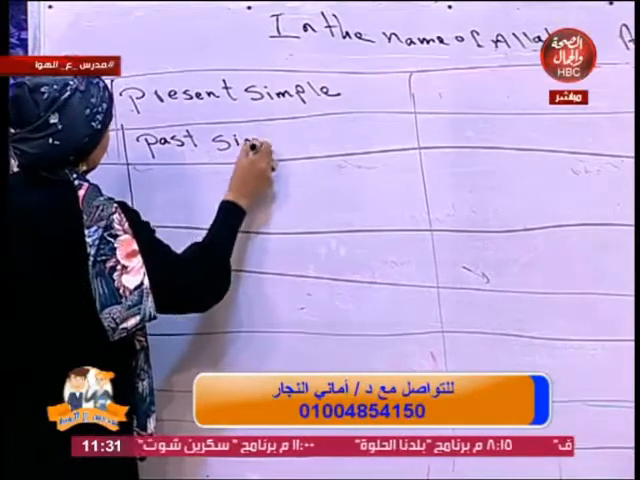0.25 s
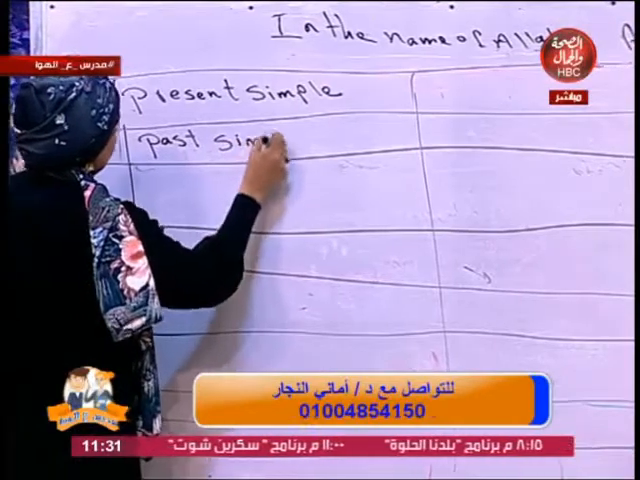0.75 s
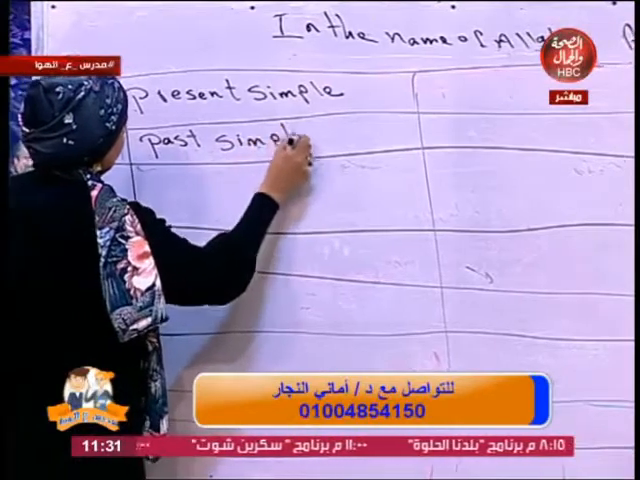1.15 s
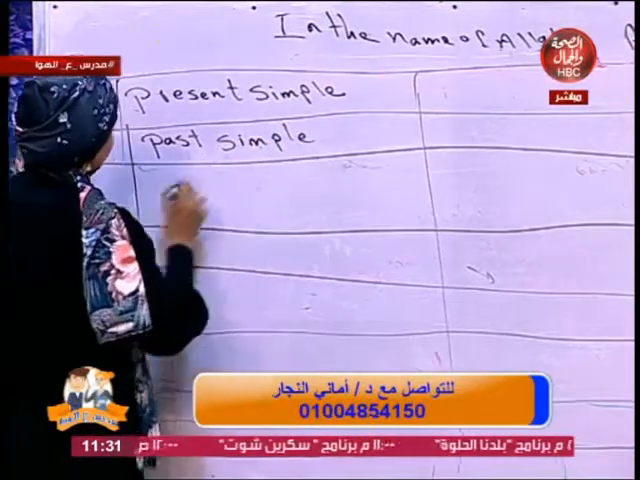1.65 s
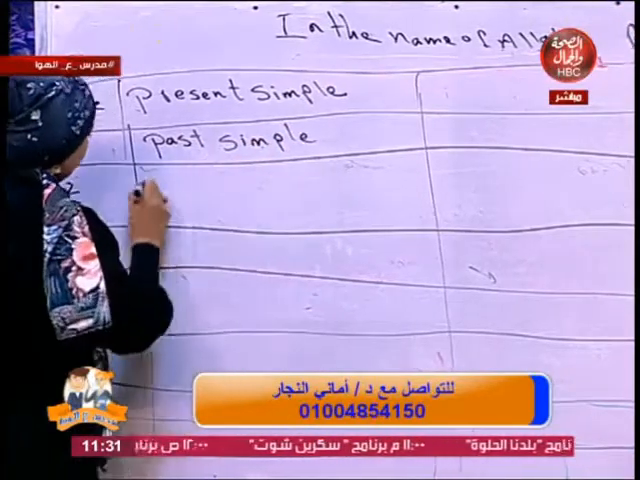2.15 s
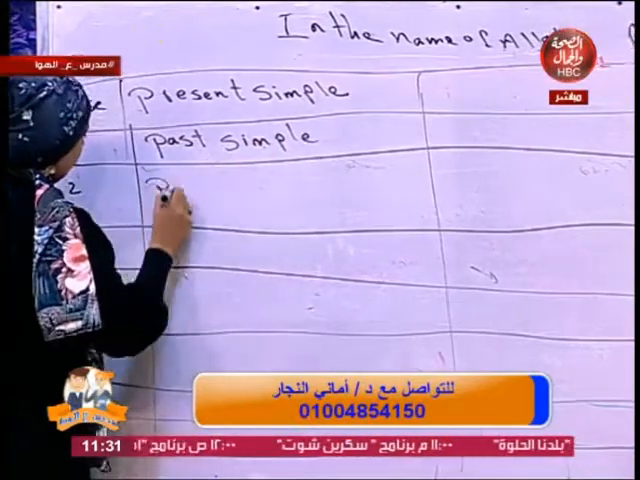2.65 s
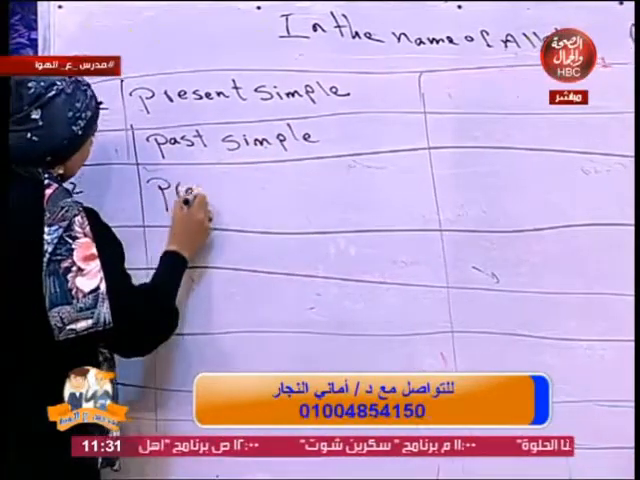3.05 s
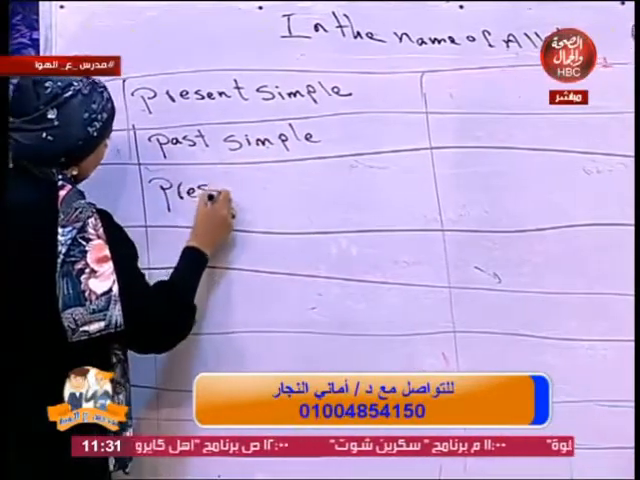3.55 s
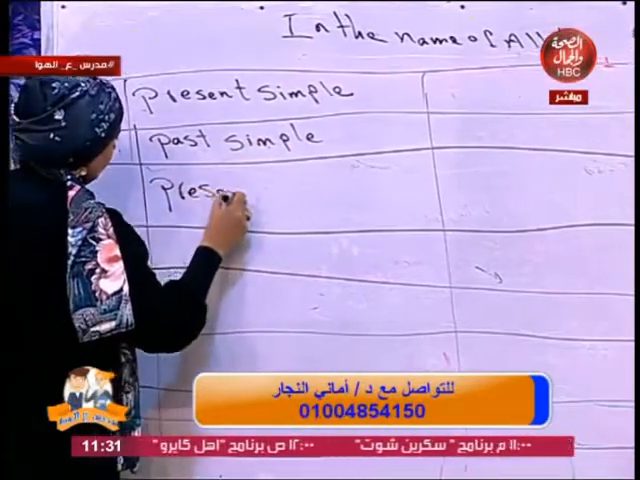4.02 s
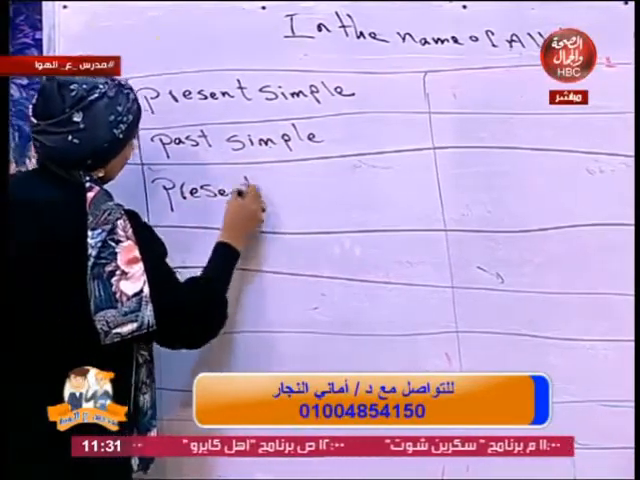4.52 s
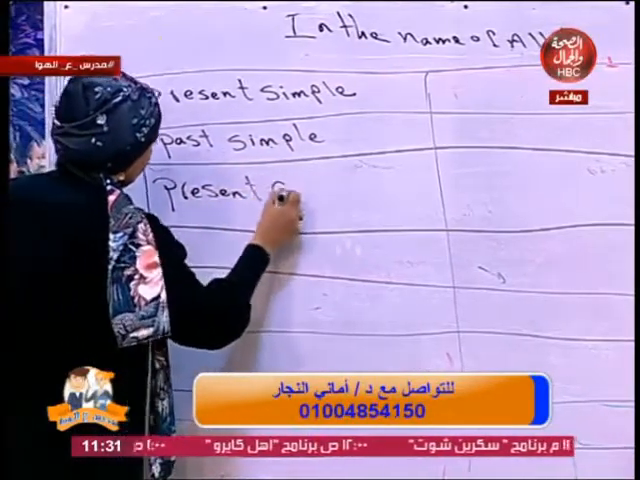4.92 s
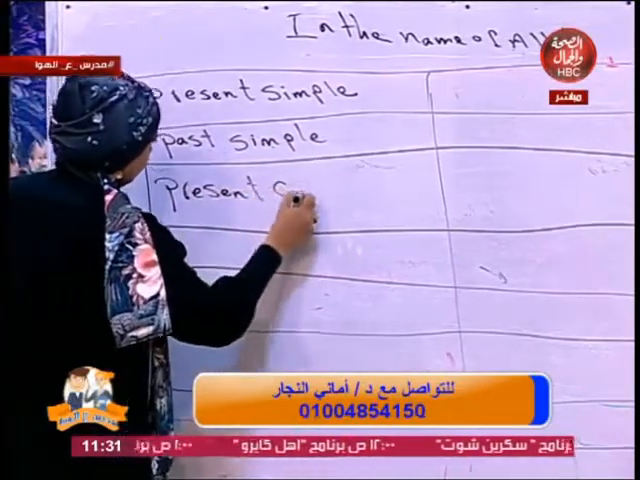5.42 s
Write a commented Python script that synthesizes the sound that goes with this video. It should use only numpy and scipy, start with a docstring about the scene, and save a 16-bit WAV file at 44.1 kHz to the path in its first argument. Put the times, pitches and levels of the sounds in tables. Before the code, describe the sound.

A felt marker hisses in short grainy strokes on a large whiteboard, its landings knocking the hollow panel, in a quietly humming room.

```python
"""A felt marker writes on a large wall whiteboard in a quiet room that hums faintly throughout.
From the start the felt hisses, thin and grainy, stroke by stroke, and the hand slides softly on the panel.
Soon each landing of the tip knocks the panel, which booms briefly; some strokes judder into a faint squeak.
A sleeve brushes at times, also under the writing: crinkling noise in smooth swells, coloured as cloth.
Near the end something hollow knocks close by and rebounds: short modes with a dense clatter.
"""
import sys
import numpy as np
from scipy import signal
from scipy.fft import rfft, irfft
from scipy.io import wavfile
from scipy.ndimage import map_coordinates

SR = 44100
rng = np.random.default_rng(int(sys.argv[2]) if len(sys.argv) > 2 else 0)


def file_out(sig):
    """Save sig as 16-bit WAV at sys.argv[1]."""
    # one column per channel
    cols = np.atleast_2d(sig).T
    # limit, then scale
    lim = np.clip(cols, -1, 1)
    pcm = np.round(lim * 32767).astype(np.int16)
    wavfile.write(sys.argv[1], SR, pcm)


N = 250488
TIME = np.arange(N) / SR
CUTOFF_HZ = 10350  # top of the finished sound


def from_db(db):
    """Decibels to gain."""
    return 10 ** (np.asarray(db) / 20)


def rms_one(x):
    """Scale to unit power."""
    return x / np.sqrt(np.mean(x ** 2) + 1e-20)


def coloured(x, spectrum):
    """Give a steady sound a spectrum of (f/Hz, relative level/dB) points, joined on a log axis; rms 1."""
    hz, db = np.transpose(spectrum)
    bins = np.maximum(np.fft.rfftfreq(len(x), 1 / SR), 1)
    gain = from_db(np.interp(np.log(bins), np.log(hz), db))
    return rms_one(irfft(rfft(x) * gain, len(x)))


def drift(rate, size=N):
    """Smooth chance with spread 1, through `rate` random points per second."""
    knots = rng.standard_normal(4000)
    places = np.arange(size) / SR * rate
    return rms_one(map_coordinates(knots, [places], order=2, mode="wrap"))


def narrow_noise(centre_hz, width_hz):
    """Noise in one resonance: slow complex noise shifted up to the centre; rms 1."""
    sos = signal.butter(2, width_hz / 2, fs=SR, output="sos")
    slow = signal.sosfilt(sos, rng.standard_normal(N) + 1j * rng.standard_normal(N))
    return rms_one(np.real(slow * np.exp(2j * np.pi * centre_hz * TIME)))


def fade(start, end, rise_s, fall_s):
    """A gate with soft edges, half open at start and end."""
    opening = np.clip((TIME - start) / rise_s + .5, 0, 1)
    closing = np.clip((end - TIME) / fall_s + .5, 0, 1)
    return opening * closing


def die_away(s, decay_s):
    """A sudden onset that falls exponentially, to 1/e in decay_s."""
    return (TIME > s) * np.exp(-np.clip(TIME - s, 0, 1) / decay_s)


def swells(rows):
    """Movements that grow and die away as bells, down to 1/e at the half-length."""
    total = 0
    for s, half_s, db in rows:
        bell = np.exp(-np.minimum(((TIME - s) / half_s) ** 2, 50))
        total = total + from_db(db) * bell
    return total


def push(s, hz):
    """Pressure from a short smooth push: the second derivative of a bell, its spectrum peaking at hz."""
    u = np.minimum((np.pi * hz * (TIME - s)) ** 2, 50)
    return (2 * u - 1) * np.exp(-u)


def resonate(x, hz, width_hz):
    """One resonance with gain 1 on top."""
    return signal.lfilter(*signal.iirpeak(hz, hz / width_hz, fs=SR), x + 1e-18)


def ring(force, modes, delay_s, build_s):
    """Damped modes that start after a delay and build up as the waves come back from the edges."""
    t = np.maximum(TIME[:SR] - delay_s, 0)
    response = 0
    for k, (hz, db, t60) in enumerate(modes):
        mode = from_db(db - 60 * t / t60) * np.sin(2 * np.pi * hz * t)
        response = response + mode * (-1) ** k  # neighbours ring in opposite sense
    return signal.fftconvolve(force, response * (1 - np.exp(-t / build_s)))[:N]


# murmur of the room: f/Hz, relative level/dB
AIR_SPECTRUM = [(15, -50), (25, -28), (48, -11), (126, 1.5), (345, -5), (433, -4), (586, -7.5), (682, -9.5),
                (946, -10.5), (1070, -12.5), (1190, -14), (1870, -18), (2180, -18.5), (3890, -23),
                (10400, -29.5), (13500, -73), (22000, -120)]
AIR_DB = -62.7


def air():
    """The steady murmur of the room: coloured noise."""
    return from_db(AIR_DB) * coloured(rng.standard_normal(N), AIR_SPECTRUM)


# diffuse tail of the room, by octave: centre f/Hz, relative level/dB, t60/s
ROOM_TAIL = [(68.7, -7.5, 0.72), (158, -16, 0.9), (301, -9.5, 0.42), (688, -8.5, 0.27), (1270, -21, 0.75),
             (2580, -17.5, 0.35)]


def room(x, delay_s=0.0046, level_db=-23.0):
    """A diffuse tail: octaves of noise that each die at their own rate."""
    t, tail = np.maximum(TIME[:SR] - delay_s, 0), 0
    for hz, db, t60 in ROOM_TAIL:
        sos = signal.butter(2, [hz / np.sqrt(2), hz * np.sqrt(2)], "band", fs=SR, output="sos")
        dying = rng.standard_normal(SR) * (t > 0) * from_db(db - 60 * t / t60)
        tail = tail + signal.sosfilt(sos, dying)
    return signal.fftconvolve(x, tail * from_db(level_db))[:N]


# first reflections from floor, ceiling and walls: delay t/s, level/dB
FIRST_ECHOES = [(0.0107, -12.5), (.0131, -7.5), (0.0169, -14.5), (.0217, -7.5), (0.0295, -22.5)]


def reflections(x):
    """The nearest surfaces send the knock back a few times."""
    return sum(from_db(db) * np.interp(TIME - delay, TIME, x, left=0) for delay, db in FIRST_ECHOES)


# brushes of the sleeve: middle t/s, half-length t/s, level/dB
SLEEVE_BRUSHES = [(1.64, 0.055, -61), (2.15, 0.35, -67), (4.02, 0.32, -64.5), (5.25, 0.031, -66),
                  (5.43, 0.13, -64.5)]
# colour of the cloth: f/Hz, relative level/dB
CLOTH_SPECTRUM = [(80, 9), (300, 8.5), (1000, 4.5), (2300, -1.5), (4000, -6.5), (7000, -10.5), (10500, -13)]


def sleeve():
    """Cloth brushes as the arm moves on: crinkling noise under smooth swells."""
    crinkle = from_db(1.5 * drift(120))
    return swells(SLEEVE_BRUSHES) * coloured(rng.standard_normal(N) * crinkle, CLOTH_SPECTRUM)


# slides of the hand on the panel: middle t/s, half-length t/s, level/dB
HAND_SLIDES = [(.16, 0.048, -66), (.34, 0.18, -67), (.58, 0.074, -68.5)]


def hand_slide():
    """The side of the hand rubs softly along the panel, a resonant band of noise."""
    return swells(HAND_SLIDES) * narrow_noise(centre_hz=843, width_hz=310)


# a hollow knock close by and its rebound: t/s, relative level/dB
HOLLOW_KNOCKS = [(5.1325, -38), (5.228, -54.5)]
# modes of the hollow thing: f/Hz, relative level/dB, t60/s
HOLLOW_MODES = [(341, 3, 0.12), (368, -1, 0.095), (503, -8, 0.057), (584, -5.5, 0.065), (740, -8, 0.064),
                (917, -4, 0.087), (980, -10, 0.027), (1090, -12, 0.055), (1390, -2, 0.022),
                (1720, -13, 0.034), (2030, -16, 0.039)]


def hollow_knock(body_db=-0.5, clatter_db=-13.0, clatter_t60_s=0.077, tail_db=-8.5, tail_t60_s=0.47):
    """A hard knock: a few short modes, a dense clatter and its own tail in the room."""
    clicks, envelope = np.zeros(N), 0
    for s, db in HOLLOW_KNOCKS:
        clicks[round(s * SR)] = from_db(db)
        t = np.clip(TIME - s, 0, 1)
        clatter_fall = from_db(clatter_db - 60 * t / clatter_t60_s)
        tail_fall = from_db(tail_db - 60 * t / tail_t60_s)
        envelope = envelope + from_db(db) * (t > 0) * (clatter_fall + tail_fall)
    clatter = coloured(rng.standard_normal(N), [
        (150, -7), (330, -2), (500, -3.5), (750, -1), (1100, -6.5),
        (1500, -18), (2200, -19.5), (4000, -33.5), (9000, -47)])
    body = from_db(body_db) * ring(clicks, HOLLOW_MODES, delay_s=0, build_s=0.00076)
    return body + envelope * clatter


# the tip judders and half squeaks: t/s, length t/s, f/Hz, level/dB
TIP_JUDDERS = [(0.097, 0.15, 2230, -73), (0.392, 0.21, 2256, -75), (1.186, 0.17, 2180, -77),
               (2.986, 0.052, 2540, -72), (3.255, 0.03, 2400, -77), (3.666, 0.028, 2360, -66),
               (4.247, 0.14, 2340, -75), (4.807, 0.047, 2330, -70), (5.361, 0.025, 2250, -60),
               (5.424, 0.066, 2390, -72.5)]


def judders(width_hz=240):
    """The juddering tip gives a rough, faint squeak: noise gathered round one pitch."""
    total = 0
    for s, length, hz, db in TIP_JUDDERS:
        total = total + from_db(db) * fade(s, s + length, 0.0064, 0.059) * narrow_noise(hz, width_hz)
    return total


# sweeps of the pen, each from a landing or turn to the next turn or lift:
# t/s, length t/s, relative level/dB, upper minus lower tip resonance level/dB
PEN_SWEEPS = [(0, 0.067, -73.5, -1), (0.089, 0.088, -70, -11), (.15, 0.095, -69.5, -3),
              (0.381, 0.11, -69, 2), (0.509, 0.1, -68.5, 4), (0.594, 0.17, -70, 5),
              (0.902, 0.094, -66.5, 3), (1.124, 0.12, -72.5, 6), (1.176, 0.094, -68.5, 1),
              (1.26, 0.11, -68, 6), (1.886, 0.1, -65.5, -9), (1.958, 0.076, -66.5, -4),
              (2.177, 0.14, -67, -1), (2.316, 0.073, -66, 14), (2.53, 0.068, -72.5, 8),
              (2.594, 0.11, -64, -1), (2.834, 0.082, -70, 3), (2.91, 0.079, -65.5, 1),
              (2.982, 0.081, -67, 4), (3.188, 0.074, -67.5, 0), (3.257, 0.13, -69, 3),
              (3.378, 0.063, -67.5, 1), (3.536, 0.13, -68, -2), (3.628, 0.12, -68.5, 2),
              (3.848, .047, -68, -7), (3.923, 0.044, -67.5, 17), (3.968, 0.11, -67, -6),
              (4.239, 0.072, -68.5, -3), (4.3, 0.066, -68, -3), (4.523, 0.041, -69.5, 2),
              (4.717, 0.067, -65, -15), (4.78, 0.1, -67, -5), (4.988, 0.14, -69, -3),
              (5.083, .065, -67, -6), (5.264, .05, -76, -4), (5.359, 0.11, -68.5, -9),
              (5.654, 0.087, -69.5, -7)]
# loudness at a turn as a share of the peak; skew of the arch (1 = peak midway, less = earlier)
TURN_SHARE, SWEEP_SKEW = 0.56, 0.57
TOUCH_S, LIFT_S = .006, .026  # the felt comes down and leaves the board
# scrape of a medium sweep, and its rise in dB per dB of sweep level
MEDIUM_STROKE_DB, SCRAPE_DB, SCRAPE_FOLLOWS = -67, -65, 1
BITE_DB, BITE_S = -66, 0.009  # extra scrape when the felt has just come down


def pen_motion():
    """Gains of both tip resonances and the scrape: a sweep is an arch of speed, a fresh landing bites."""
    lower, upper, scrape = np.zeros((3, N))
    lifted_s = -1
    for s, length, db, lean_db in PEN_SWEEPS:
        progress = np.clip((TIME - s) / length, 0, 1)
        arch = TURN_SHARE + (1 - TURN_SHARE) * np.sin(np.pi * progress ** SWEEP_SKEW)
        sweep = arch * fade(s, s + length, TOUCH_S, LIFT_S)
        lower_gain = from_db(db) / np.hypot(1, from_db(lean_db))  # the two share the power
        scrape_db = SCRAPE_DB + SCRAPE_FOLLOWS * (db - MEDIUM_STROKE_DB)
        lower = np.maximum(lower, lower_gain * sweep)
        upper = np.maximum(upper, lower_gain * from_db(lean_db) * sweep)
        scrape = np.maximum(scrape, from_db(scrape_db) * sweep)
        if s - lifted_s > LIFT_S / 2:  # a landing, not a turn
            scrape = scrape + from_db(BITE_DB) * die_away(s, BITE_S)
        lifted_s = s + length
    return lower, upper, scrape


def patchy(x, depth_db, shifts_per_s, count=22, size=256):
    """Neighbouring bands of a rubbing sound rise and sink on their own, so its colour keeps shifting."""
    hz, s, frames = signal.stft(x, SR, nperseg=size)
    chance = rng.standard_normal((count, 200))  # bands by moments
    places = np.meshgrid(hz / CUTOFF_HZ * count, s * shifts_per_s, indexing="ij")
    gain_db = depth_db * map_coordinates(chance, places, order=2, mode="mirror")
    return signal.istft(frames * from_db(gain_db), SR, nperseg=size)[1][:len(x)]


# hiss of the felt: f/Hz, relative level/dB
HISS_SPECTRUM = [(3000, -14), (4500, -4.5), (5900, -1.5), (7000, -1.5), (7700, 4), (9000, -1), (10300, -3)]
# scrape on the panel: f/Hz, relative level/dB
SCRAPE_SPECTRUM = [(60, -1), (130, -1), (450, 16), (800, 1.5), (1200, 3), (1800, -1), (2400, 5.5),
                   (3000, -2), (3500, 0), (4500, -9.5), (7000, -12), (10500, -35.5)]


def strokes(grain_db=1.0, flutter_db=1.03, trade_db=1.5, trades_per_s=30,
            hiss_db=5.5, lower_db=-3.0, upper_db=1.5):
    """Felt fibres catch and slip: grainy hiss, two tip resonances that trade level, and a panel scrape."""
    lower, upper, scrape = pen_motion()
    trade = trade_db * drift(trades_per_s)  # as the pen turns
    slips = rng.standard_normal((2, N)) * from_db(grain_db * drift(650))
    lower_tip = from_db(lower_db - trade) * lower * narrow_noise(8350, 1300)
    upper_tip = from_db(upper_db + trade) * upper * narrow_noise(9750, 1200)
    felt = from_db(hiss_db) * (lower + upper) / 2 * coloured(slips[0], HISS_SPECTRUM)
    rubbing = lower_tip + upper_tip + felt + scrape * coloured(slips[1], SCRAPE_SPECTRUM)
    return from_db(flutter_db * drift(70)) * patchy(rubbing, depth_db=2.0, shifts_per_s=12)


# modes of the panel: f/Hz, relative level/dB, t60/s
PANEL_MODES = [(65, -29.5, 0.37), (86, -22, 0.49), (111.2, -26.5, 0.24), (145, -19, 0.35),
               (182.3, -2, 0.46), (220.9, -4.5, 0.3), (239.7, -2.5, 0.23), (252.8, -8, 0.44),
               (289, -8.5, 0.55), (336.6, -8.5, 0.28), (380, -8, 0.056), (408.3, 8, 0.1),
               (446.2, 2.5, 0.12), (470.8, -0.5, 0.25), (523.7, -12, 0.38), (553, 1, 0.063),
               (625, -7.5, 0.17), (690, -1, 0.13), (762, -17.5, 0.35), (905, -27, 0.4), (866, -25, 0.6),
               (990, -35.5, 0.27), (1150, -42, .15)]


def panel_ring(force, coupling_db=-39.5):
    """Bending waves spread over the panel and set its modes going."""
    return from_db(coupling_db) * ring(force, PANEL_MODES, delay_s=0.0023, build_s=0.0027)


# landings of the marker: t/s, strength level/dB, contact f/Hz (firm = high),
# panel drive against the knock level/dB, f/Hz favoured by that spot of the panel
LANDINGS = [(0.374, -31, 477, -3, 626), (0.886, -28.5, 470, -4.5, 644), (1.121, -35, 347, -1.5, 587),
            (1.8701, -20.5, 485, -7, 590), (2.182, -45, 290, -18, 218), (2.534, -49.5, 224, -21, 220),
            (2.835, -21, 411, -7, 517), (3.193, -48.5, 265, -8, 220), (3.5367, -36, 308, -3.5, 466),
            (3.85, -43.5, 310, -2, 476), (4.228, -30, 434, -3, 467), (4.5265, -18, 502, -4.5, 484),
            (4.722, -46, 383, -5, 400), (4.988, -42, 406, -3, 400), (5.274, -49, 330, -1.5, 388),
            (5.622, -34.5, 470, -1, 430)]
# levels for a medium tap, and their rise in dB per dB of strength
MEDIUM_TAP_DB = -30
FLEX_DB, FLEX_FOLLOWS = -35.5, 0.43
TICK_DB, TICK_FOLLOWS = -62, 0.82
SNAP_DB, SNAP_FOLLOWS, SNAP_HZ = -55, 1.1, 1260  # the hard holder behind the felt


def taps(flex_hz=125, flex_lag_s=0.0022, spot_db=-3.0, spot_width_hz=170, room_db=-3.0,
         tick_decay_s=0.015):
    """A landing is a knock with a snap, a slower flex of the board, their ringing and a plastic tick."""
    knocks = force = flex = ticks = 0
    for s, db, hz, ring_db, spot_hz in LANDINGS:
        pulse, harder_db = push(s, hz), db - MEDIUM_TAP_DB
        # each spot drives some modes best
        favoured = from_db(spot_db) * resonate(pulse, spot_hz, spot_width_hz)
        snap = from_db(SNAP_DB + SNAP_FOLLOWS * harder_db) * push(s, SNAP_HZ)
        knocks = knocks + from_db(db) * (pulse + .5 * favoured) + snap
        force = force + from_db(db + ring_db) * (0.82 * pulse + favoured)
        flex = flex - from_db(FLEX_DB + FLEX_FOLLOWS * harder_db) * push(s + flex_lag_s, flex_hz)
        ticks = ticks + from_db(TICK_DB + TICK_FOLLOWS * harder_db) * die_away(s, tick_decay_s)
    plastic = [(300, 8.0), (1500, -0.5), (2500, -1.0), (4000, -19.5), (9000, -13)]
    tick = ticks * coloured(rng.standard_normal(N), plastic)
    direct = knocks + flex + tick
    ringing = panel_ring(force + 0.065 * flex)
    tail = from_db(room_db) * room(direct + 0.73 * ringing)
    return direct + ringing + reflections(knocks) + tail


def scene():
    """Everything as heard by one microphone near the writer."""
    background = air() + sleeve() + hand_slide() + hollow_knock()
    writing = judders() + strokes() + taps()
    return (background + writing)[None]


def record(dry):
    """The deepest bass is thinned and the top is cut."""
    thin = signal.sosfilt(signal.butter(3, 50, "high", fs=SR, output="sos"), dry)
    return signal.sosfilt(signal.ellip(12, .1, 70, CUTOFF_HZ, fs=SR, output="sos"), thin)


dry = scene()
out = record(dry)
file_out(out)
```